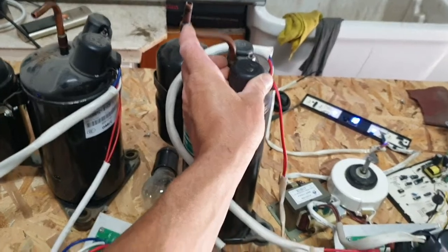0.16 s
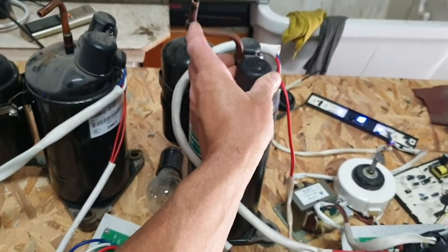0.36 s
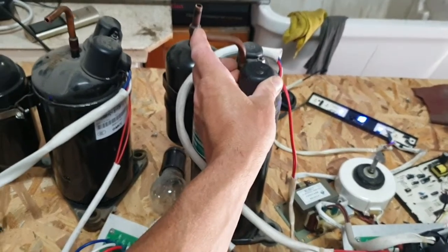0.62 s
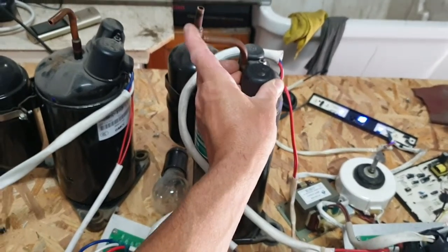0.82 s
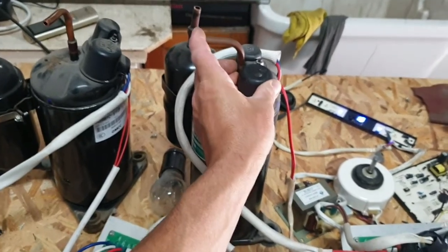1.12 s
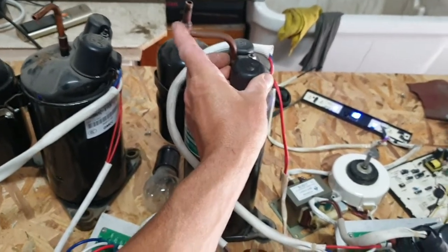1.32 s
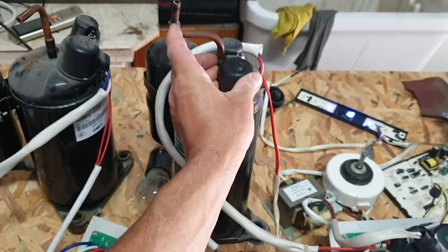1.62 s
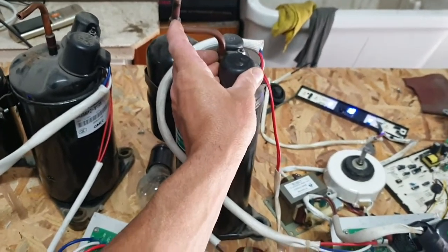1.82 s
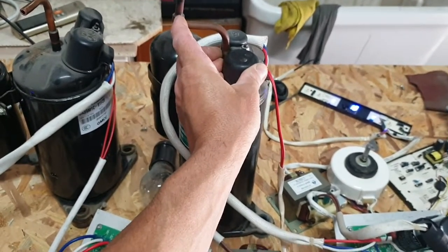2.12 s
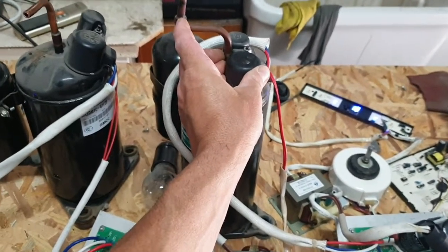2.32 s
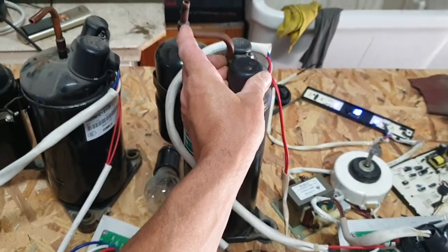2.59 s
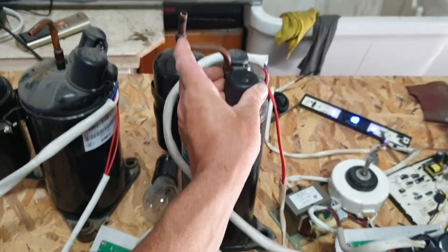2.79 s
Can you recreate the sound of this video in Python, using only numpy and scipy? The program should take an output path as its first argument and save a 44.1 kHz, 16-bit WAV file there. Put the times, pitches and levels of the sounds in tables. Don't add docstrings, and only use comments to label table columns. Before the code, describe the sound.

A small compressor hums and chatters on a wooden bench, close to a phone microphone; its plugged tube spits a sharp thumping hiss, the machine drops quieter, a weaker spit follows, and a whine creeps up.

```python
import sys
import numpy as np
from scipy import signal
from scipy.fft import rfft, irfft
from scipy.io import wavfile
from scipy.ndimage import uniform_filter1d

SR = 44100
rng = np.random.default_rng(int(sys.argv[2]) if len(sys.argv) > 2 else 0)


def pcm_store(signal):
    levels = np.round(np.clip(np.atleast_2d(signal), -1, 1) * 32767)
    wavfile.write(sys.argv[1], SR, levels.astype(np.int16).T)


def linear_from_db(decibels):
    return 10 ** (np.asarray(decibels, float) / 20)


N = 130095
T = np.arange(N) / SR

# time_s, speed_turns_per_s
SHAFT_SPEED = [(0, 72.86), (.8, 73.17), (1.45, 73.45), (2.0, 73.85), (2.95, 74.15)]
# order (multiple of shaft speed), level_db, lag_turns (behind the valve)
SHAFT_ORDERS = [(1, -41, 0.3), (2, -46.5, 0.65), (3, -59, 0.19), (4, -61, 0.012), (5, -66, 0.28),
                (10, -66, 0), (11, -61, 0.054), (15, -64.5, 0.032)]
# pitch_hz, level_db
BENCH_BUZZ = [(140.04, -52), (210.06, -68), (280.08, -69), (350, -57), (770, -58), (1540.4, -59),
              (1610.5, -61)]
# pitch_hz, level_db
LOOSE_PARTS = [(56.5, -54), (96.9, -60)]
# time_s, gain_db, buzz_db
GAIN_AND_BUZZ = [(0, -1, -3.5), (.2, -1, 1.5), (.82, -0.5, -1), (.86, -9, 14.5), (1.05, -9, -10.5),
                 (1.3, -10, -6.5), (1.4, -10, -6.5), (1.55, -10, -2.5), (2.1, -10.5, -16.5),
                 (2.35, -8.5, -1), (2.65, -7.5, -1), (2.95, -5.5, 3)]
# time_s, level_db
WHINE_LEVEL = [(0, -48), (.8, -62), (1.2, -45), (1.7, -42), (2.3, -39.5), (2.95, -45.5)]
# delay_turns, level_db, fade_s
KNOCKS = [
    (-.04, 0, .0007),
    (.24, -11, .0016),
    (0, -12, .006),
]
# pitch_hz, level_db
KNOCK_COLOUR = [(300, -14.5), (4000, -12), (5800, -15), (7000, -1.5), (9300, -3), (10600, -1.5),
                (15000, -0.5)]
# pitch_hz, level_db
RUB_COLOUR = [(300, -6), (4000, -4), (7000, -8), (15000, -7)]
# pitch_hz, level_db
GAS_COLOUR = [(300, -6), (3000, -3), (6000, -6), (7500, -13), (15000, -11)]
# pitch_hz, level_db
SHELL_OPEN = [(420, -8), (650, -18.5), (1250, -18.5), (2000, -15.5), (4200, -11), (5600, -9.5),
              (7000, -7.5), (15000, -11.5)]
SHELL_PLUGGED = [(420, -18.5), (650, -25), (1300, -21), (2000, -15), (4200, -18), (5300, -18.5),
                 (7500, -15), (15000, -16)]
# pitch_hz, width_hz, level_db
RINGS_OPEN = [(1680, 370, 8.5), (2424, 150, 6), (3430, 380, 8.5), (4790, 115, 8), (5160, 200, -10),
              (6050, 230, -7), (6570, 150, 6.5), (8200, 123, 8), (8770, 140, 6), (10310, 350, 7.5),
              (11030, 195, 5.5), (12130, 390, 6.5), (12850, 510, -1.5), (13700, 360, -1)]
RINGS_PLUGGED = [(2390, 81, 4), (3240, 150, 9.3), (3742, 72, 11.8), (4400, 320, 6.2), (6660, 790, 6),
                 (8070, 180, 9.8), (8850, 180, 9.8), (10570, 270, 3.5), (10390, 750, 5.7),
                 (11040, 160, 9.1), (11720, 95, 6.1), (12270, 120, 7.3), (12650, 120, 5), (14300, 230, 6.1)]
# multiple (of drive pitch), level_db
TUBE_HARMONICS = [(24, -53), (25, -62), (35, -53), (36, -55), (47, -58), (48, -60), (50, -62), (69, -56),
                  (70, -64)]
# time_s, level_db
TUBE_LEVEL = [(0, -1.5), (.3, -1.5), (.55, 0.5), (.82, 1), (.9, -35), (2.2, -23), (2.6, -1), (2.95, -0.5)]
# time_s, hiss_db, gust_db (gust on the microphone)
FIRST_SPIT = [(0.81, -50, -56), (0.834, -23.5, -31), (0.864, -23, -39), (0.932, -25, -56),
              (0.948, -25, -42), (0.996, -24, -43), (1.03, -28, -49.5), (1.075, -36.5, -69),
              (1.17, -46, -73)]
SECOND_SPIT = [(1.325, -54, -77), (1.342, -35.5, -51), (1.37, -28.5, -41.5), (1.39, -26, -41.5),
               (1.42, -27, -44.5), (1.441, -28, -52.5), (1.495, -36, -58.5), (1.55, -41.5, -81),
               (1.64, -57, -84)]
# pitch_hz, level_db
HISS_COLOUR = [(300, -57), (900, -25.5), (1500, -17.5), (5900, -11), (7200, -6.5), (9000, -9),
               (12100, -1.5), (15000, -5)]
GUST_COLOUR = [(25, -2), (50, 0.5), (210, -5), (1110, -5.5), (2690, -6), (5000, -11.5), (9000, -37)]
# start_s, push_db, puff_db
THUMPS = [
    (.854, -24, -40),
    (0.9953, -20.5, -27),
    (1.387, -32, -37),
]
# pitch_hz, level_db
RUMBLE_COLOUR = [(15, -39), (25, -10.5), (64, -1.5), (147, -8), (252, -11.5), (355, -16), (657, -29.5),
                 (763, -12.5), (900, -15.5), (1170, -37.5), (1980, -120)]
# pitch_hz, lean_db
MACHINE_LEAN = [(60, 11.5), (180, 2.5), (550, 4), (1650, 5.5), (4970, 3), (15000, 11.5)]
AIR_LEAN = [(60, -0.5), (240, 8), (950, 7), (3770, 5), (15000, 6)]
NO_LEAN = [(1, 0), (2, 0)]
# pitch_hz, likeness (0 to 1)
LIKENESS = [(60, 0.82), (240, 0.43), (950, 0.2), (3770, 0.15), (15000, 0.27)]
# pitch_hz, share (0 to 1)
DROPOUTS = [(300, 0), (550, .26), (780, .05), (1200, .2), (1600, .03), (4000, .07), (5200, .3), (6600, 0)]

START_TURN, TYPICAL_TURNS_PER_S = 0.59, SHAFT_SPEED[2][1]
DRIVE_HZ = 70.02


def curve(table, count=1):
    rows = np.array(table, float)
    return np.interp(T, rows[:, 0], rows[:, count])


def read(points, hz):
    f, value = np.transpose(points)
    return np.interp(np.log(hz + 1), np.log(f + 1), value)


def evened(x):
    return x / np.sqrt(np.mean(x ** 2) + 1e-20)


def tone(hz, turn=0):
    return np.cos(2 * np.pi * (hz * T + turn))


def sides(left_db, right_db):
    return linear_from_db(np.array([[left_db], [right_db]]))


def colour(x, points, rings=(), lean=MACHINE_LEAN):
    hz = np.fft.rfftfreq(x.shape[-1], 1 / SR)
    gain = linear_from_db(read(points, hz)) * (hz > points[0][0])
    for f, width, db in rings:
        gain = gain * (1 + (linear_from_db(min(db, 11)) - 1) / (1 + 2j * (hz - f) / width))
    half = read(lean, hz) / 2
    return irfft(rfft(x) * gain * linear_from_db(np.array([half, -half])), x.shape[-1])


def flat(x):
    z = rfft(x)
    lumps = np.sqrt(uniform_filter1d(abs(z) ** 2, size=9, axis=-1))
    return irfft(z / lumps, x.shape[-1]) * np.linalg.norm(x, axis=-1, keepdims=True)


def noise(alike=True):
    a, b = rfft(rng.standard_normal((2, N)))
    c = np.clip(read(LIKENESS, np.fft.rfftfreq(N, 1 / SR)), 0, 1) * alike
    return irfft(np.array([a, c * a + np.sqrt(1 - c ** 2) * b]), N)


def turns():
    return START_TURN + np.cumsum(curve(SHAFT_SPEED)) / SR


def hum():
    angle = turns()
    held = np.clip((T - 0.7) / 0.028, 0, 1)
    orders = [linear_from_db(db) * np.cos(2 * np.pi * (k * angle - lag)) for k, db, lag in SHAFT_ORDERS]
    orders[0] = orders[0] * linear_from_db(-6 * held)
    loose = linear_from_db(-24 * held) * sum(linear_from_db(db) * tone(hz) for hz, db in LOOSE_PARTS)
    drive = linear_from_db(-45) * tone(DRIVE_HZ, -0.05)
    mains = linear_from_db(-61.5) * tone(195.5)
    buzz = sum(linear_from_db(db) * tone(hz, -0.1) for hz, db in BENCH_BUZZ)
    buzz = linear_from_db(curve(GAIN_AND_BUZZ, count=2)) * buzz
    return np.sqrt(2) * (sum(orders) + loose + drive + mains + buzz) * sides(2.2, -2.8)


def whine():
    angle = turns()
    wander = evened(uniform_filter1d(rng.standard_normal((2, N)), 900))
    flutter = 1 + 0.27 * wander + 0.22 * np.cos(2 * np.pi * angle)
    carrier = np.cos(2 * np.pi * (22 * angle - np.array([[0], [0.2]])))
    return np.sqrt(2) * linear_from_db(curve(WHINE_LEVEL)) * flutter * carrier * sides(1.8, -1.8)


def knocking(after_s):
    rise_s = 0.0006
    total = 0
    for turn, db, fade_s in KNOCKS:
        u = after_s - (turn + 0.06) / TYPICAL_TURNS_PER_S
        total = total + linear_from_db(db) * np.clip(u / rise_s, 0, 1) * np.exp(-np.maximum(u - rise_s, 0) / fade_s)
    return total


def clatter():
    angle = turns()
    at = np.interp(np.arange(1, int(angle[-1])), angle, np.arange(N))
    idx = np.clip(at.astype(int)[:, None] + np.arange(-16, 17), 0, N - 1)
    offset = idx - at[:, None]
    pulse = np.sinc(offset) * np.cos(np.pi * offset / 36) ** 2
    share = rng.standard_normal((len(at), 6))
    share = uniform_filter1d(share, int(TYPICAL_TURNS_PER_S / 4), axis=0)
    share = share / np.linalg.norm(share, axis=1, keepdims=True)
    out, shape = np.zeros((2, N)), np.sqrt(knocking(np.arange(1200) / SR))
    for k in range(6):
        train = np.bincount(idx.ravel(), (pulse * share[:, k:k + 1]).ravel(), N)
        knock, rub = rng.standard_normal((2, 2, 1200))
        knock = colour(shape * flat(shape * knock) * 2, KNOCK_COLOUR, lean=NO_LEAN)
        rub = np.hanning(1200) * colour(rub, RUB_COLOUR, lean=NO_LEAN)
        out += signal.fftconvolve(train[None], knock + rub, axes=1)[:, :N]
    return evened(out)


def gas():
    burst = 2.07 * knocking(turns() % 1 / curve(SHAFT_SPEED))
    steady = colour(noise(), GAS_COLOUR, lean=NO_LEAN)
    return steady + colour(burst * noise(), KNOCK_COLOUR, lean=NO_LEAN)


def valve():
    drive = linear_from_db(-37.5) * clatter() + linear_from_db(-38.5) * gas()
    plugged = np.clip((T - 0.85) / 0.15, 0, 1)
    before = evened(colour(drive, SHELL_OPEN, RINGS_OPEN))
    after = linear_from_db(0.2) * evened(colour(drive, SHELL_PLUGGED, RINGS_PLUGGED))
    return np.sqrt(np.mean(drive ** 2)) * ((1 - plugged) * before + plugged * after)


def singing_tube():
    phase = rng.random((len(TUBE_HARMONICS), 2, 1))
    lines = sum(linear_from_db(db) * tone(k * DRIVE_HZ, u) for (k, db), u in zip(TUBE_HARMONICS, phase))
    return 2 * linear_from_db(curve(TUBE_LEVEL)) * lines * sides(2.0, -2.0)


def spits():
    grain = linear_from_db(evened(uniform_filter1d(rng.standard_normal(N), 60)))
    hiss = evened(colour(noise(False), HISS_COLOUR, lean=AIR_LEAN) * grain)
    low = uniform_filter1d(hiss, size=5)
    gust = evened(colour(noise(False), GUST_COLOUR, lean=AIR_LEAN))
    out = 0
    for table in (FIRST_SPIT, SECOND_SPIT):
        start_s, end_s = table[0][0], table[-1][0]
        on = np.clip(np.minimum(T - start_s, end_s - T) / 0.0031, 0, 1)
        hiss_db = curve(table)
        treble = linear_from_db(0.32 * np.minimum(hiss_db + 23.5, 0))
        jet = linear_from_db(hiss_db + 8.0) * (low + treble * (hiss - low))
        out = out + on * (jet + linear_from_db(curve(table, count=2) + 6.5) * gust)
    return out


def thumps():
    push_hz, drop_hz, push_fade_s, puff_fade_s = 64.3, 122, 0.0053, 0.018
    air = evened(colour(noise(), GUST_COLOUR, lean=AIR_LEAN))
    out = np.zeros((2, N))
    for start_s, push_db, puff_db in THUMPS:
        u = np.maximum(T - start_s - 0.0017 * np.array([[0], [1]]), 0)
        angle = push_hz * u + drop_hz * 0.0019 * (1 - np.exp(-u / 0.0011))
        push = linear_from_db(push_db) * np.sin(2 * np.pi * angle) * np.exp(-u / push_fade_s)
        swell = np.clip((T - start_s) / 0.0055 + 1, 0, 1) * np.exp(-u / puff_fade_s)
        out += push * sides(3.0, -4.0) + linear_from_db(puff_db) * swell * air
    return out


def rumble():
    return linear_from_db(-46.5) * evened(colour(noise(), RUMBLE_COLOUR))


def scene():
    machine = hum() + whine() + linear_from_db(7.5) * valve() + singing_tube() + rumble()
    return linear_from_db(curve(GAIN_AND_BUZZ)) * machine + spits() + thumps()


def drop_weak_patches(x):
    hz, _, z = signal.stft(x, SR, nperseg=2048, noverlap=1536)
    power = (abs(z) ** 2).sum(0)
    fine, broad = [uniform_filter1d(uniform_filter1d(power, size=n, axis=0), size=2, axis=1)
                   for n in (5, 11)]
    usual = np.sqrt(uniform_filter1d(power, 61, axis=0) * power[:300].sum(0))
    strength = np.where(hz[:, None] < 2000, fine, broad) / usual
    rank = np.argsort(np.argsort(strength, axis=1), axis=1) / power.shape[1]
    weak = rank < read(DROPOUTS, hz)[:, None]
    return signal.istft(z * linear_from_db(-30 * weak), SR, nperseg=2048, noverlap=1536)[1][:, :N]


def top_cut(x):
    return signal.sosfilt(signal.butter(12, 15840, fs=SR, output="sos"), x)


def record(dry):
    hz = np.fft.rfftfreq(N, 1 / SR)
    edge_db = -110 * np.maximum(hz - 14520, 0) / 1000
    mix = drop_weak_patches(irfft(rfft(dry) * linear_from_db(edge_db), N))
    return top_cut(mix)


dry = scene()
out = record(dry)
pcm_store(out)
```